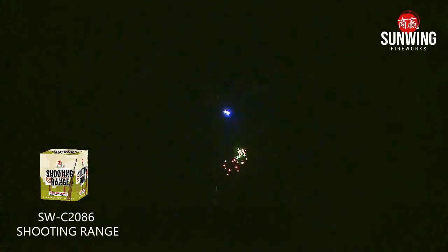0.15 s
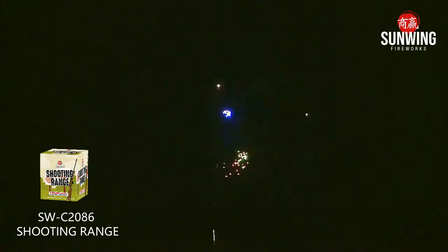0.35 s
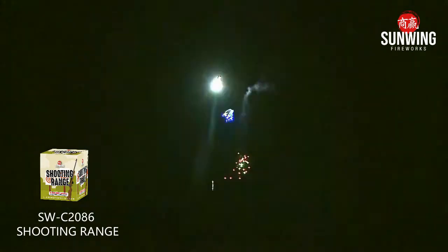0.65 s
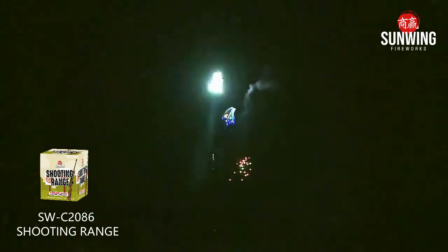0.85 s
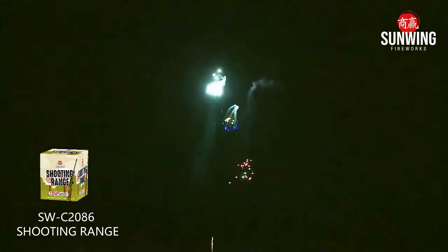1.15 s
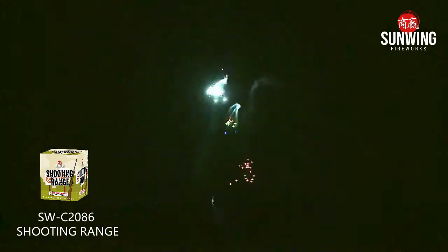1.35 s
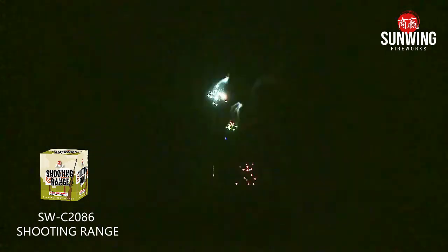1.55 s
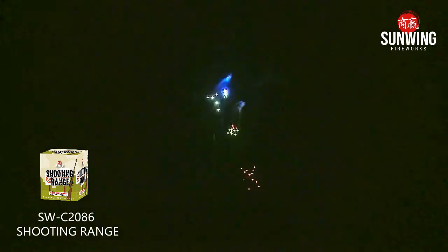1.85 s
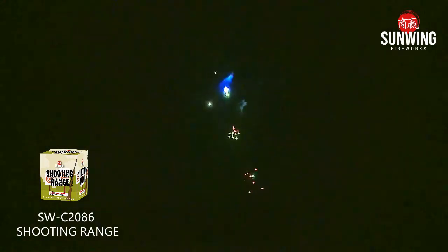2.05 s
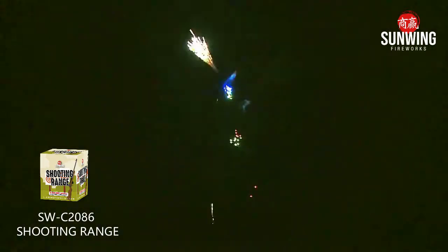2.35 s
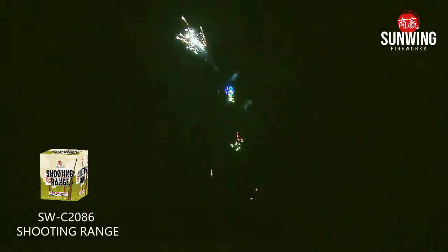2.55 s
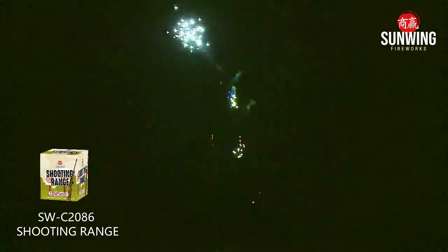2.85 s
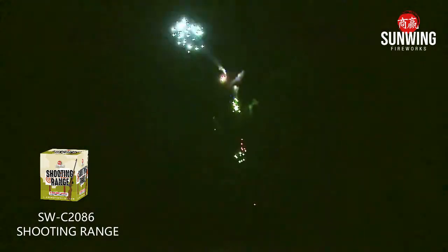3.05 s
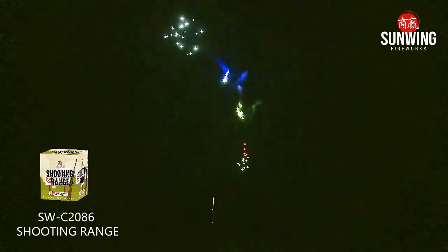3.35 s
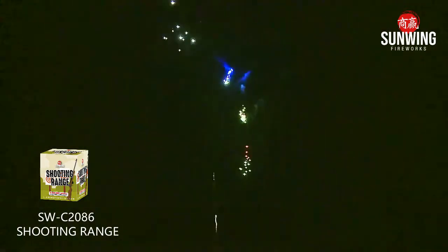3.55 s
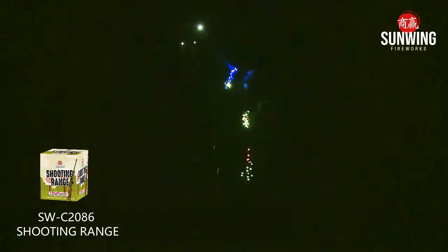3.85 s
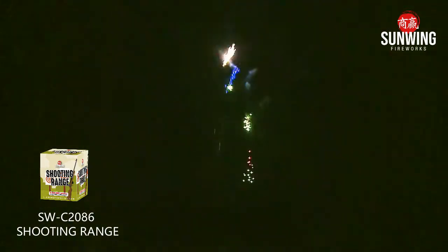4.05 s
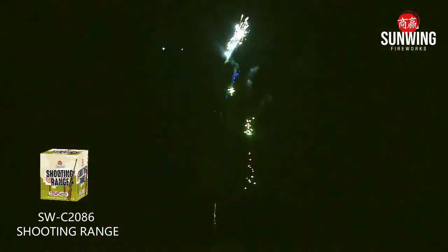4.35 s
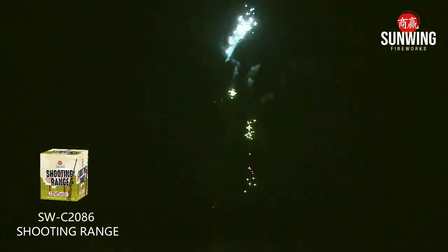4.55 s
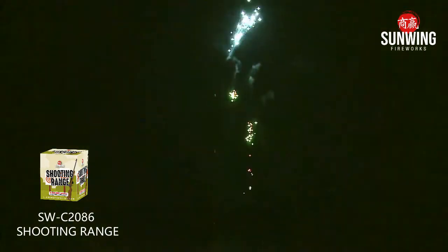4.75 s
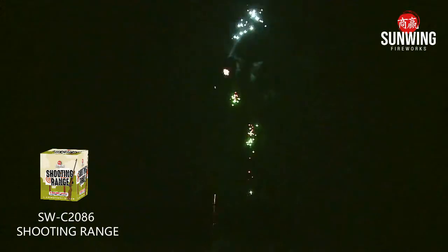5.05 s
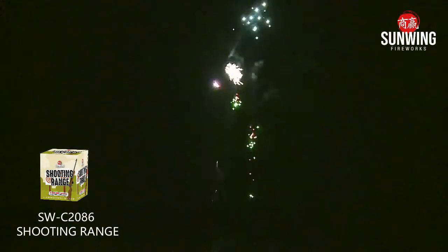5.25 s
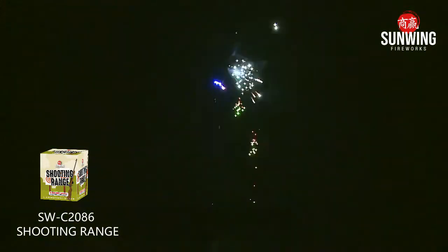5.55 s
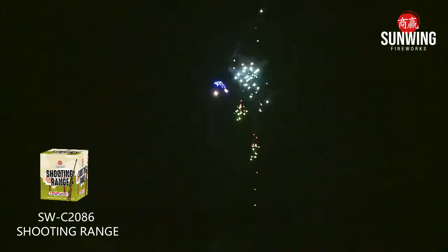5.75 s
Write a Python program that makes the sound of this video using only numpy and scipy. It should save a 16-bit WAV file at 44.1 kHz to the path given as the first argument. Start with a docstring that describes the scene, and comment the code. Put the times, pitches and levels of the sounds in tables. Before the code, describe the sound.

Eight abrupt firework launches, close and punchy, each a short thump with a bright crack, clustered wall echoes and a quickly fading noisy tail. Between them come a short hollow fizzle with hiss, small debris ticks and dull knocks. Three aerial bursts add thinner pops and grainy sputter. A late sharp snap follows the last burst. Outdoor night, single distant mono microphone, quiet traffic hum.

```python
"""Open yard at night: a small firework cake fires its tubes one after another.
Each lift charge is a short blast wave plus a bright noise crack, with filtered echoes and a noise tail
from ground, walls and a far building. Shells pop overhead the same way and sputter in random grains.
A weak charge fizzles as resonant noise, a comet hisses as puffing noise; dry ticks (noise bursts) and
low knocks (decaying sines) are mostly debris. Coloured noise hums low beneath."""
import sys
import numpy as np
from scipy import signal
from scipy.fft import rfft, irfft
from scipy.io import wavfile

SR = 44100
rng = np.random.default_rng(int(sys.argv[2]) if len(sys.argv) > 2 else 0)


def bounce(signal):
    """Save signal as a 16-bit WAV file at the path given by the first command-line argument."""
    frames = np.transpose(np.atleast_2d(signal))
    limited = np.clip(frames, -1, 1)
    pcm = np.round(limited * 32767).astype(np.int16)
    wavfile.write(sys.argv[1], SR, pcm)


def makeup_ratio(level_db):
    """Linear amplitude ratio for a level in decibels (20 dB per factor of ten)."""
    decades = np.asarray(level_db, float) / 20
    return 10 ** decades


N = 259749

# lift charges: (time [s], blast level [dB], crack drive [dB], blast ramp [ms],
#                crack part above 7 kHz [dB re part below])
LIFT_SHOTS = [(.0038, -9, -12, 1.61, 1), (.5051, -8.5, -17, 1.58, 8.5), (1.3737, -7.5, -6.5, 1.67, -25),
              (2.4216, -9, -12, 1.82, -3), (3.3234, -10.5, -7.5, 1.62, -22), (3.6838, -9.5, -9.5, 1.57, -7),
              (4.4126, -10.5, -9.5, 1.55, -1), (5.1026, -9.5, -4, 1.68, -8)]
# shells bursting overhead, same columns
SHELL_BURSTS = [(2.4305, -13, -7, 1.54, 0.5), (4.2706, -17.5, -9.5, 2.2, -17), (5.3654, -11.5, -8, 2.1, 3)]
# ground, two near walls with ledges, their double bounce, a far building:
# (delay [s], gain [dB], low cut [Hz], high cut [Hz])
YARD_ECHOES = [(.00245, -5, 300, 2000), (.00333, -7, 1000, 3200), (.02694, -6, 1000, 2200),
               (.0278, 5, 1000, 2400), (.029, -5, 60, 900), (.0357, 2.5, 300, 900), (.03844, -4, 600, 1300),
               (.06338, -6.5, 900, 2000), (.07952, -10, 400, 1300), (.0893, -12, 300, 900),
               (.1056, -15, 60, 900), (.23903, -7, 1000, 2200), (.2398, -19, 150, 2000),
               (.2503, -14, 900, 2000), (.28349, -19, 60, 800)]
# the same surfaces seen from the sky, same columns
SKY_ECHO_PATHS = [(.00875, -7, 160, 2000), (.02395, 5.5, 2400, 3300), (0.0256, -3.5, 120, 4800),
                  (0.0262, 2, 1600, 5160), (0.0287, 0, 600, 1400), (.0332, -6.5, 72, 930),
                  (0.0738, -13, 60, 870)]
# wash of scattered sound from each reflector: (delay [s], rise [s], bass gain [dB re blast],
#   treble gain [dB re blast, before hiss and lumps], bass t60 [s], treble t60 [s], both before band loss)
SCATTER_WASHES = [(0, .0001, 20.5, -1.5, 0.0058, 0.023), (.001, .002, -4.5, -9, 0.084, 0.11),
                  (0.025, 0.0084, -9, -11, 0.42, 0.25), (.06, 0.063, -22, -20.5, 1, 0.73),
                  (0.236, 0.0025, -22.5, -30, 0.47, 0.24)]
# spectrum of the scattered noise: (frequency [Hz], relative density [dB per Hz])
SCATTER_SPECTRUM = [(25, -19), (45, 2.5), (75, -2.5), (150, -2), (300, -5.5), (480, -7), (650, -7.5),
                    (850, -12), (1250, -10.5), (1750, -13.5), (2100, -18), (3300, -23), (5000, -18),
                    (6500, -23), (10500, -28), (12500, -48.5), (16500, -69)]
# resonances of the crack: (frequency [Hz], width [Hz], gain [dB])
CRACK_RESONANCES = [(2400, 3000, -17.5), (4760, 880, -0.5), (9200, 3400, -11), (12500, 1900, -18)]
# dry ticks, mostly debris nearby; the faint one at 2.189 s is a far echo of the fizzle:
# (time [s], peak [dB], centre [Hz], t60 [s])
DRY_TICKS = [(.178, -38, 8750, 0.0075), (0.204, -44, 7400, 0.013), (1.8531, -39.5, 3800, 0.011),
             (2.189, -54.5, 3540, .03), (2.388, -58, 10110, 0.016), (2.709, -45, 9800, 0.026),
             (2.8372, -39.5, 2870, 0.0039), (2.837, -40, 9750, 0.051), (2.894, -49, 9455, .012),
             (2.913, -47, 10000, 0.014), (3.828, -48, 10340, .01), (3.947, -49, 9000, .01),
             (5.005, -25.5, 7900, 0.0069), (5.6016, -9, 8100, 0.0097)]
# low knocks: heavier pieces, and at 1.85 s a pop with its wall echo:
# (time [s], start level [dB], ring [Hz], t60 [s])
LOW_KNOCKS = [(1.8535, -30.5, 880, 0.0053), (1.879, -38, 920, 0.019), (2.8367, -25.5, 440, 0.028),
              (2.8438, -32, 440, .04), (2.893, -37, 367, 0.03), (2.913, -38, 394, 0.025),
              (5.692, -38.5, 252, 0.063)]
# spectrum of the night hum: (frequency [Hz], relative density [dB per Hz])
NIGHT_SPECTRUM = [(20, -5), (45, 4.5), (118, -5.5), (221, -8), (520, -8.5), (736, -12), (1250, -11.5),
                  (1750, -17), (2100, -22.5), (3100, -28.5), (5000, -27.5), (6500, -31.5), (10900, -33),
                  (15300, -43), (16500, -59)]
# edges of the half-octave decay bands [Hz]
BAND_EDGES_HZ = 20 * 2 ** np.arange(0, 10.1, .5)
# added fading of the tail, negative = slower; air and leaves eat the treble:
# (frequency [Hz], loss [dB per s])
TAIL_LOSS = [(50, 10.5), (200, -7), (600, -10), (1400, -14.5), (3000, -3), (6000, 13.5), (9000, 20.5),
             (14000, 16)]
# a weak charge fizzles and a wall answers: (time [s], start level [dB, 10 dB above the rms played], t60 [s])
FIZZLE_BURSTS = [(1.9283, -26.5, 0.12), (1.9529, -32, 0.39)]
# resonances of the fizzling tube: (frequency [Hz], width [Hz], gain [dB])
TUBE_RESONANCES = [(600, 130, 4), (1280, 250, 3.5), (1750, 120, -0.5), (2550, 470, -14)]
# echoes are coloured by a resonance near 1.35 kHz, probably the microphone's:
# (frequency [Hz], width [Hz], gain [dB])
ECHO_RESONANCE = (1353, 230, 4.8)
# the ground under the tubes: (frequency [Hz], start level [dB re blast], t60 [s])
GROUND_THUMP = [(45, -23, .25), (77.5, -29.5, 0.33), (117, -45, 0.32)]
# direct and ground paths from the sky cancel in bands: (frequency [Hz], gain [dB re yard spectrum])
SKY_PATH_GAIN = [(100, -2), (250, 1.5), (450, -1.5), (600, -19), (850, -11), (1100, -11), (1400, 1.5),
                 (2000, -6), (2700, 8), (3400, -2.5), (4600, 3), (5900, -9), (8000, 5.5), (14000, 0)]


def rms_one(x):
    """Scales to unit rms."""
    return x / np.sqrt(np.mean(x ** 2) + 1e-30)


def at_hz(points, hz):
    """Reads a spectrum table, linear in log frequency."""
    table_hz, value = np.array(points).T
    return np.interp(np.log(hz), np.log(table_hz), value)


def filtered(x, order, cut_hz, kind="low"):
    """Butterworth filter, low-pass by default."""
    return signal.sosfilt(signal.butter(order, cut_hz, kind, fs=SR, output="sos"), x)


def band(x, low_hz, high_hz, order=2):
    """Butterworth band-pass."""
    return filtered(x, order, [low_hz, min(high_hz, .45 * SR)], "band")


def shape(noise, spectrum):
    """Applies a gain spectrum [dB]."""
    hz = np.maximum(np.fft.rfftfreq(len(noise), 1 / SR), 1)
    return irfft(rfft(noise) * makeup_ratio(at_hz(spectrum, hz)), len(noise))


def coloured(spectrum, size):
    """White noise given a spectrum, unit rms."""
    return rms_one(shape(rng.standard_normal(size), spectrum))


def add(out, s, piece):
    """Mixes a piece in at a time [s]."""
    at = round(s * SR)
    out[at:at + len(piece)] += piece[:N - at]


def resonate(x, hz, width_hz):
    """Two-pole resonance with zeros at DC and Nyquist."""
    r = np.exp(-np.pi * width_hz / SR)
    poles = [1, -2 * r * np.cos(2 * np.pi * hz / SR), r * r]
    return signal.lfilter([(1 - r * r) / 2, 0, (r * r - 1) / 2], poles, x)


def modes(x, table):
    """Parallel resonances of alternating sign."""
    return sum((-1) ** k * makeup_ratio(db) * resonate(x, hz, width) for k, (hz, width, db) in enumerate(table))


def shots(rows, echoes, path_gain, crack_ms, hiss_db, grit_db):
    """Direct blast and crack, scattered tail, ground thump and distinct echoes."""
    waves, cracks = blasts(rows, crack_ms)
    crack = filtered(modes(cracks, CRACK_RESONANCES), 4, 13500)
    out = waves + crack + scattered(rows, path_gain, hiss_db, grit_db)
    thump = ground_thump()
    for s, blast_db, *_ in rows:
        add(out, s, makeup_ratio(blast_db) * thump)
    return out + reflected(waves + 0.44 * crack, echoes)


def blasts(rows, crack_ms):
    """A pressure jump ramps through zero into suction and relaxes; hot gas adds a ragged crack."""
    waves, cracks = np.zeros(N), np.zeros(N)
    t_ms = np.arange(300) / SR * 1000
    gases = rng.standard_normal((len(rows), 300))
    for (s, blast_db, crack_db, ramp_ms, edge_db), gas in zip(rows, gases):
        relax = np.exp(-(np.maximum(t_ms - ramp_ms, 0) / (.22 * ramp_ms)) ** 2)
        ramp = np.minimum(t_ms / ramp_ms, 1) * 1.6 - 1
        add(waves, s, makeup_ratio(blast_db) * ramp * relax)
        puff = 1.2 * gas * np.exp(-t_ms / crack_ms) - 8.4 * (t_ms == 0)  # noise after a one-sample spike
        body = filtered(puff, 1, 7000)
        add(cracks, s, makeup_ratio(crack_db) * (body + makeup_ratio(edge_db) * (puff - body)))
    return waves, cracks


def ground_thump():
    """The ground under the tubes rings in low decaying sines."""
    t = np.arange(round(.5 * SR)) / SR
    return -sum(makeup_ratio(db - 60 * t / t60) * np.sin(2 * np.pi * hz * t) for hz, db, t60 in GROUND_THUMP)


def reflected(direct, echoes):
    """Each surface returns a delayed, band-limited copy; a resonance is added, rough walls blur the treble."""
    back = np.zeros(N)
    for s, db, low_hz, high_hz in echoes:
        lag = round(s * SR)
        thin = filtered(direct + 1e-18, 1, low_hz, "high")
        back[lag:] += makeup_ratio(db) * filtered(thin, 2, high_hz)[:N - lag]
    back = back + modes(back, [ECHO_RESONANCE])
    bright = filtered(back, 4, 3900, "high")
    blur = rng.standard_normal(400) * np.exp(-np.arange(400) / 90)
    return filtered(back, 5, 2100) + makeup_ratio(-14) * signal.fftconvolve(bright, blur)[:N]


def scattered(rows, path_gain, hiss_db, grit_db):
    """The yard scatters bass alike for every blast; treble falls differently and in lumps each time."""
    t, out = np.arange(round(1.2 * SR)) / SR, np.zeros(N)
    bass_level, treble_level = washes(t)
    bass = band(dying_noise(t, path_gain), 15, 2000, order=4) * bass_level
    for s, blast_db, *_ in rows:
        lumps = rms_one(band(rng.standard_normal(len(t)), 23, 270, order=1)) * np.exp(-t / 0.18)
        level = makeup_ratio(hiss_db + grit_db * lumps) * treble_level
        treble = level * band(dying_noise(t, path_gain), 2000, 19000, order=4)
        add(out, s, makeup_ratio(blast_db) * (bass + treble))
    return out


def washes(t):
    """Bass and treble envelopes: every reflector's wash rises and dies, powers add."""
    bass, treble = 0, 0
    for s, rise_s, bass_db, treble_db, bass_t60, treble_t60 in SCATTER_WASHES:
        since = np.maximum(t - s, 0)
        up = 1 - np.exp(-since / rise_s)
        bass = bass + (up * makeup_ratio(bass_db - 60 * since / bass_t60)) ** 2
        treble = treble + (up * makeup_ratio(treble_db - 60 * since / treble_t60)) ** 2
    return np.sqrt(bass), np.sqrt(treble)


def dying_noise(t, path_gain):
    """Noise in the colour of the yard, each band changing level at its own pace."""
    noise = shape(coloured(SCATTER_SPECTRUM, len(t)), path_gain)
    return sum(band(noise, low, high) * makeup_ratio(-t * at_hz(TAIL_LOSS, np.sqrt(low * high)))
               for low, high in zip(BAND_EDGES_HZ, BAND_EDGES_HZ[1:]))


def posts(count):
    """Evenly spaced posts near the tubes answer in a flutter of equal echoes at equal steps."""
    first_s, step_s, gain_db, low_hz, high_hz = .011, .0025, -12.5, 120, 900
    return [(first_s + k * step_s, gain_db, low_hz, high_hz) for k in range(count)]


def clutter(count):
    """Small things return dull chance echoes, one per equal step of root delay, so they thin out."""
    near_s, far_s, low_hz, high_hz = .04, .15, 129, 990
    gain_db, loss_db_per_s, spread_db = -15, 76, 1.5
    near, far = np.sqrt(near_s), np.sqrt(far_s)
    place, size = rng.random((count, 2)).T
    s = (near + (far - near) * (np.arange(count) + place) / count) ** 2
    db = gain_db - loss_db_per_s * s + spread_db * (2 * size - 1)  # weaker with distance
    return [(delay_s, echo_db, low_hz, high_hz) for delay_s, echo_db in zip(s, db)]


def sputter():
    """Stars sputter after each burst: uneven bright grains at random times, dying away."""
    grains_per_s, level_re_blast_db, t60_s, rise_s = 1500, -27, 0.43, 0.033
    out, t = np.zeros(N), np.arange(round(.3 * SR)) / SR
    for s, blast_db, *_ in SHELL_BURSTS:
        born = rng.random(len(t)) < grains_per_s / SR
        sizes = makeup_ratio(4 * rng.exponential(1, len(t)))
        gate = signal.lfilter([1], [1, -.97], born * sizes)
        grains = rms_one(band(gate * rng.standard_normal(len(t)), 3800, 5506))
        fade = makeup_ratio(blast_db + level_re_blast_db - 60 * t / t60_s)
        add(out, s, fade * np.minimum(t / rise_s, 1) * grains)
    return out


def fizzle():
    """Rough burning noise in the resonances of the tube, dying fast."""
    out, t = np.zeros(N), np.arange(9000) / SR
    gases = rng.standard_normal((len(FIZZLE_BURSTS), 9000))
    for (s, db, t60), gas in zip(FIZZLE_BURSTS, gases):
        add(out, s, makeup_ratio(db - 10 - 60 * t / t60) * rms_one(modes(gas, TUBE_RESONANCES)))
    return out


def ticks_and_knocks():
    """Ticks: bright noise bursts with duller body and faint afterglow; knocks: low decaying sines."""
    out, t = np.zeros(N), np.arange(4000) / SR
    grits = rng.standard_normal((len(DRY_TICKS), 4000))
    for (s, db, hz, t60), grit in zip(DRY_TICKS, grits):
        snap = grit * (makeup_ratio(-60 * t / t60) + makeup_ratio(-36 - 60 * t / .08))
        tick = band(snap, .65 * hz, 1.45 * hz) + makeup_ratio(-4) * band(snap, .2 * hz, .55 * hz)
        add(out, s, makeup_ratio(db) * tick / np.abs(tick).max())
    for s, db, hz, t60 in LOW_KNOCKS:
        add(out, s, makeup_ratio(db - 60 * t / t60) * np.sin(2 * np.pi * hz * t))
    return out


def comet():
    """A burning star hisses in uneven puffs, thin at first, fuller once the charge catches, then fades."""
    light_s, light_rise_s, catch_s, puff_db = 1.835, 0.034, 1.926, 1
    thin_db, thin_rise_db_per_s, thin_stop_db_per_s = -63, 15, 500  # level at the catch
    full_db, full_fade_db_per_s = -49, 120
    t = np.arange(N) / SR - catch_s
    thin = makeup_ratio(thin_db + np.where(t < 0, thin_rise_db_per_s, -thin_stop_db_per_s) * t)
    thin = thin * np.clip((t + catch_s - light_s) / light_rise_s, 0, 1)
    full = makeup_ratio(full_db - full_fade_db_per_s * np.abs(t)) * (t > 0)
    puffs = makeup_ratio(puff_db * rms_one(band(rng.standard_normal(N), 8, 45, order=1)))
    noise = puffs * rng.standard_normal(N)
    thin_hiss = rms_one(band(noise, 6000, 11500, order=3))
    full_hiss = rms_one(band(noise, 2200, 8000))
    return thin * thin_hiss + full * full_hiss


def night():
    """Far traffic hum as coloured noise; its bass swells and sags."""
    hum = makeup_ratio(-56.5) * coloured(NIGHT_SPECTRUM, N)
    swell = rms_one(band(rng.standard_normal(N), 0.73, 2.9, order=1))
    return hum + band(hum, 22, 170) * (makeup_ratio(1.47 * swell) - 1)


def scene():
    """All sources, heard from one spot, alike in both channels."""
    lift_echoes = YARD_ECHOES + posts(count=4) + clutter(count=14)
    near_flat = [(100, 0.0026), (10000, 0.014)]  # (frequency [Hz], gain [dB])
    lifts = shots(LIFT_SHOTS, lift_echoes, near_flat, crack_ms=0.88, hiss_db=0.13, grit_db=2.5)
    burst_echoes = SKY_ECHO_PATHS + clutter(count=4)
    bursts = shots(SHELL_BURSTS, burst_echoes, SKY_PATH_GAIN, crack_ms=0.99, hiss_db=0.5, grit_db=3.5)
    mix = lifts + bursts + sputter() + fizzle() + ticks_and_knocks() + comet() + night()
    return np.tile(mix, (2, 1))


def roll_off(x):
    """The treble ends steeply here."""
    return signal.sosfilt(signal.butter(12, 17170, fs=SR, output="sos"), x)


def record(dry):
    """The microphone drops the highest treble and the deepest bass."""
    treble_cut = filtered(dry, 6, 15500)
    mix = filtered(treble_cut, 2, 40, "high")
    return roll_off(mix)


dry = scene()
out = record(dry)
bounce(out)
```